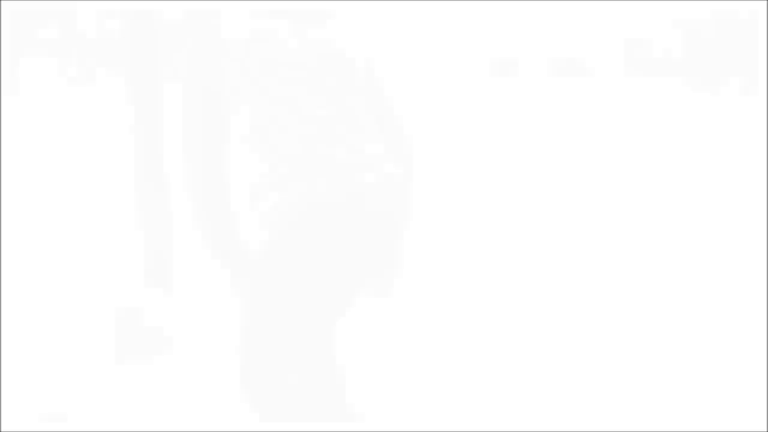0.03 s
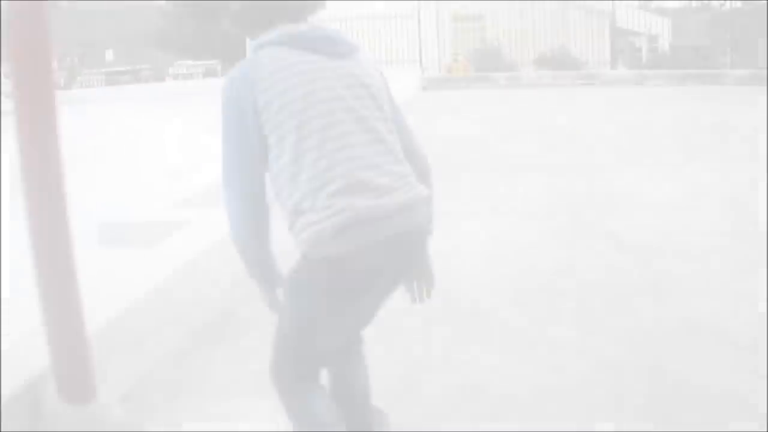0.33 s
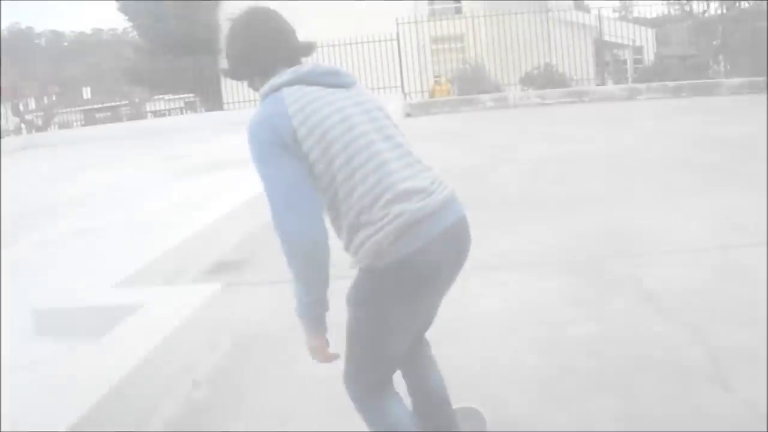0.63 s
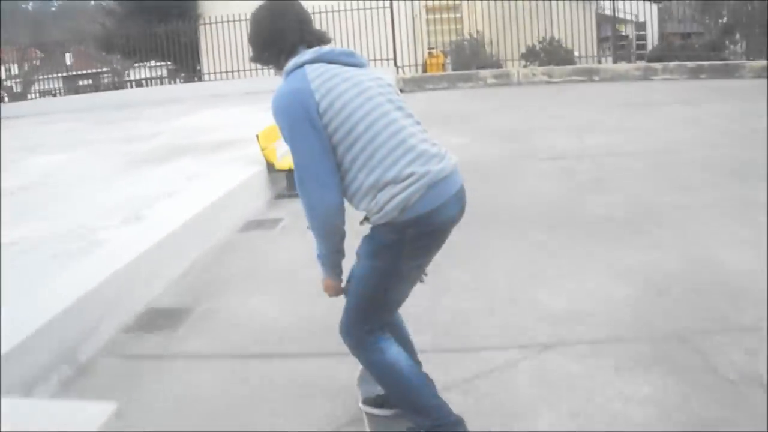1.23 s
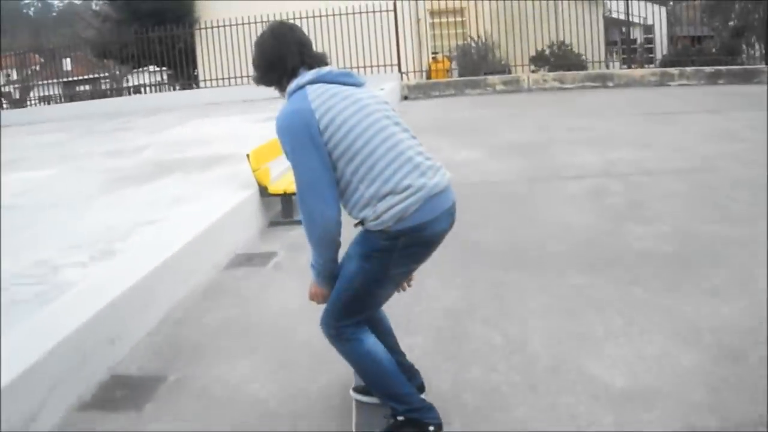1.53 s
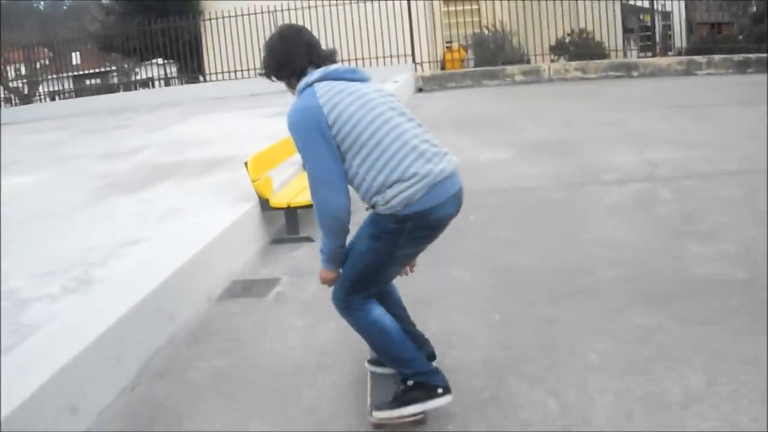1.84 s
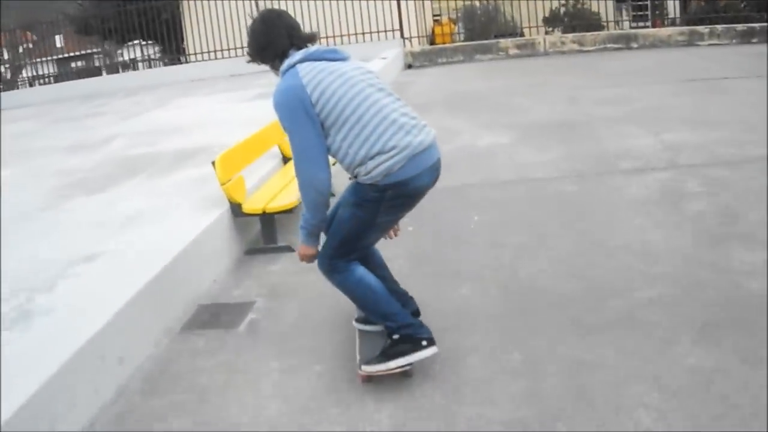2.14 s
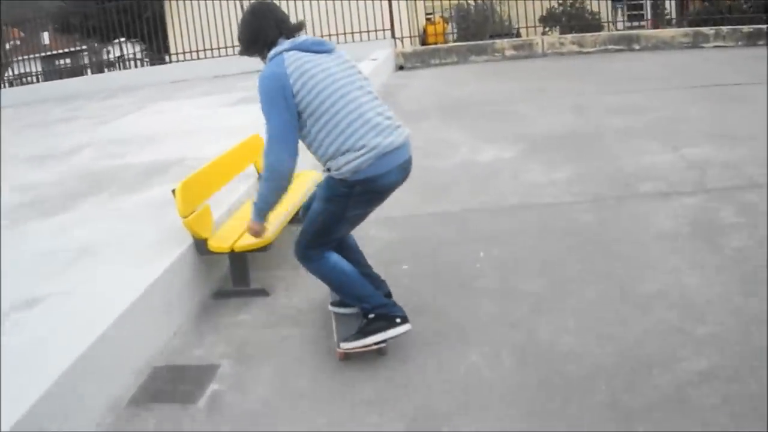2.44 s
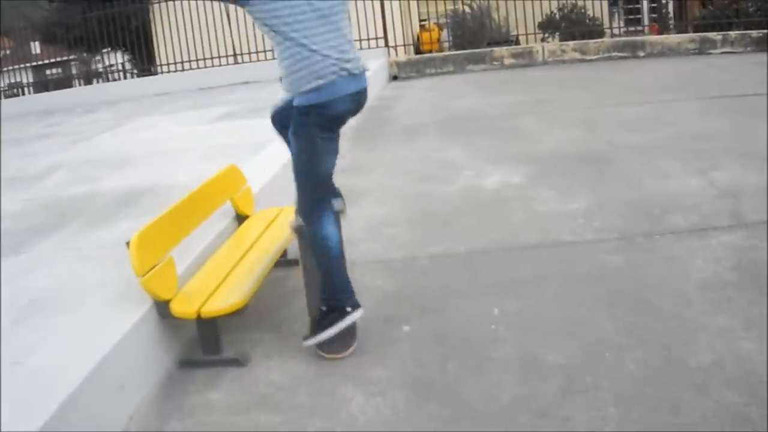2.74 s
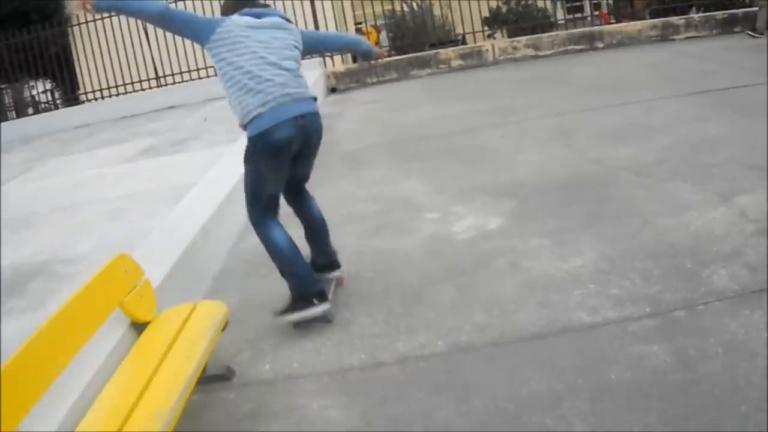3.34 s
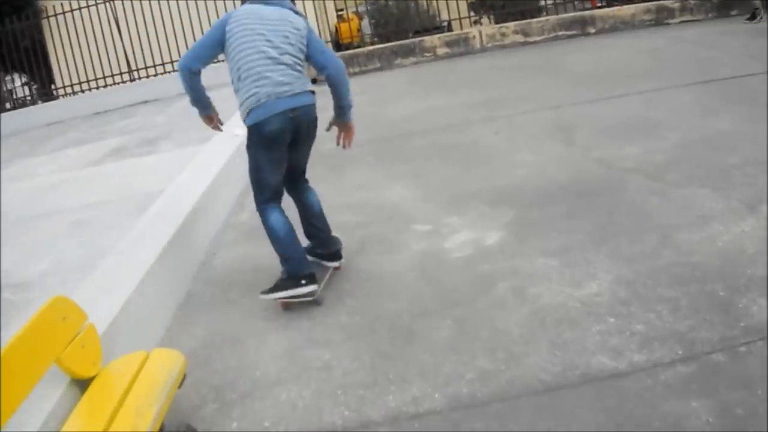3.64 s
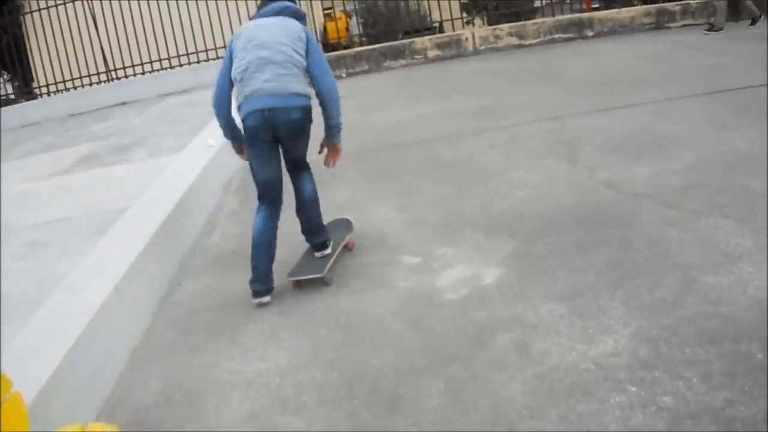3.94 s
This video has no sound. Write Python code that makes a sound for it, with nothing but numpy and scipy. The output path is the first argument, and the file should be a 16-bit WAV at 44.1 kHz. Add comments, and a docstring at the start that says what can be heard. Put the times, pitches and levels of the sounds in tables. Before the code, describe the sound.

A skateboard rolls over rough concrete, pops, scrapes along a bench and lands with a clack.

```python
"""Skateboard and bench

The microphone rides on a skateboard rolling over rough concrete in an open yard: the grain makes its wheels
roar, the bearings hiss and sing, and wind buffets the microphone. Alongside, another board's tail pops, it
knocks onto a slatted bench and scrapes along it, the wheels thud down, the deck slaps the ground and the roll
fades. The blows are bursts of tiny contacts and ringing modes of wood and steel."""
import sys
import numpy as np
from scipy import signal
from scipy.fft import rfft, irfft
from scipy.io import wavfile
from scipy.ndimage import uniform_filter1d

SR = 44100
rng = np.random.default_rng(int(sys.argv[2]) if len(sys.argv) > 2 else 0)


def inscribe(sig):
    """Save sig as 16-bit PCM at rate SR to the path in sys.argv[1].

    A 1-D sig is mono; a 2-D sig holds one channel per row.
    Samples are clipped to [-1, 1] before scaling.
    """
    pcm = np.round(np.clip(np.atleast_2d(sig).T, -1, 1) * 32767)
    wavfile.write(sys.argv[1], SR, pcm.astype(np.int16))


N = 176400
T = np.arange(N) / SR


def from_db(db):
    """Decibels to gain."""
    return 10 ** (np.asarray(db) / 20)


def unit_rms(x):
    """Scale to unit power."""
    return x / np.sqrt(np.mean(x ** 2) + 1e-20)


def fader(points):
    """A gain ride through (time [s], level [dB]) points."""
    return from_db(np.interp(T, *np.transpose(points)))


def swell(start, length):
    """A rounded rise and fall."""
    return np.sin(np.pi * np.clip((T - start) / length, 0, 1))


def drift(rate_hz):
    """A random wander of unit power; its rate may change with time."""
    position = np.cumsum(rate_hz * np.ones(N)) / SR
    return unit_rms(np.interp(position, np.arange(N), rng.standard_normal(N)))


def equalise(x, points):
    """Minimum-phase EQ: the points set only the shape, so white noise keeps its power."""
    hz, db = np.transpose(points)
    size = 2 * N
    bin_hz = np.arange(N + 1) * SR / size
    gain = unit_rms(from_db(np.interp(np.log(bin_hz + 1), np.log(hz), db)))
    cepstrum = irfft(np.log(gain))
    cepstrum[1:N] *= 2
    cepstrum[N + 1:] = 0
    return irfft(rfft(x, size) * np.exp(rfft(cepstrum)))[:N]


def grains(per_second=10000, spread_db=2.0):
    """Dense random contacts with the grain of the concrete."""
    sizes = from_db(spread_db * np.minimum(rng.exponential(1, N), 5))
    return sizes * rng.choice([-1, 1], N) * (rng.random(N) < per_second / SR)


def crunch(blows, eq, attack_s=0.00052, hold_s=0.0067):
    """Each blow is a short dying burst of tiny contacts, coloured by the body it hits."""
    out, size = np.zeros(N + SR), 8192
    age = T[:size]
    for start, db, decay in blows:
        fall = np.exp(-np.maximum(age - min(hold_s, decay), 0) / decay)
        envelope = np.minimum(age / attack_s, 1) * fall
        contacts = envelope * rng.choice([-1, 1], size)
        whitened = irfft(np.exp(1j * np.angle(rfft(contacts))))
        taper = envelope ** .2   # tightens the decay a little
        at = int(start * SR)
        out[at:at + size] += from_db(db) * np.linalg.norm(envelope) * whitened * taper
    return equalise(out[:N], eq)


def ring(blows, modes, spread_db=1.5):
    """Each blow (time [s], level [dB]) sets every mode ringing with a slightly random strength."""
    out, age = np.zeros(N + SR), T[:SR // 4]
    hz, mode_db, t60 = np.transpose(modes)[:, :, None]
    partials = np.sin(2 * np.pi * hz * age) * np.exp(-np.log(1000) * age / t60)
    polarity = (-1) ** np.arange(len(modes))
    for start, db in blows:
        gains = from_db(db + mode_db[:, 0] + spread_db * rng.standard_normal(len(modes)))
        at = int(start * SR)
        out[at:at + len(age)] += (gains * polarity) @ partials
    return out[:N]


def resonate(x, hz, width_hz):
    """One resonance with unity gain at its peak."""
    r = np.exp(-np.pi * width_hz / SR)
    feedback = [1, -2 * r * np.cos(2 * np.pi * hz / SR), r * r]
    return signal.lfilter(np.array([1, 0, -1]) * (1 - r * r) / 2, feedback, x)


# Level ride of the wheel roar (time [s], level [dB])
ROAR_FADER = [(.07, -21), (.25, -23), (.5, -19), (.8, -19), (1.05, -17), (1.17, -18), (1.42, -15.5),
              (1.95, -18.5), (2.2, -18.7), (2.45, -16.5), (2.62, -16), (2.8, -24), (3.3, -26.5),
              (3.43, -29.5), (3.6, -32), (3.73, -37.5)]
# Its low-mid body (frequency [Hz], gain [dB])
ROAR_EQ = [(30, -15.5), (90, -16), (170, -6), (380, -3), (620, -2), (950, -6.5), (1280, -8.5), (1600, -16),
           (2200, -30.5), (4000, -38.5), (11000, -70)]
# Wheel resonance (frequency [Hz], width [Hz], boost [dB])
WHEEL_PEAKS = [(644, 212, 8)]


def wheel_roar(flutter_db=.5, drone_db=-27):
    """Concrete grain drives wheels and deck into a fluttering roar, with a lower drone at first."""
    flutter = from_db(flutter_db * drift(70))
    body = equalise(grains(), ROAR_EQ)
    peaks = sum((from_db(db) - 1) * resonate(body, hz, width) for hz, width, db in WHEEL_PEAKS)
    roar = unit_rms(flutter * (body + peaks))
    drone = unit_rms(resonate(equalise(grains(), ROAR_EQ), hz=366, width_hz=62))
    return fader(ROAR_FADER) * roar + from_db(drone_db) * swell(start=0.03, length=0.8) * drone


# Level ride of the bearing and grit hiss (time [s], level [dB])
HISS_FADER = [(.17, -39), (.5, -36.5), (1.45, -37), (1.8, -38.5), (2.3, -39.5), (2.64, -35), (2.78, -36.5),
              (2.98, -43.5), (3.3, -44.5), (3.46, -45), (3.68, -53.5)]
# Its bright tone (frequency [Hz], gain [dB])
HISS_EQ = [(700, -27), (2000, 9), (2700, 4), (3300, 5.5), (4500, 4), (6200, 4), (7500, 0.5), (9300, 1),
           (11000, -9.5)]
# The note the bearings sing (time [s], pitch [Hz], level [dB])
SING_GLIDE = [(0.401, 5595, -55), (2.2, 5350, -44.5), (2.617, 5730, -39), (2.952, 6370, -55),
              (3.66, 6300, -64), (3.85, 6340, -51.5), (4.0, 6000, -67)]
# Roughness of that note (time [s], bandwidth [Hz])
SING_BANDWIDTH = [(2.6, 1495), (3.7, 750)]


def bearings(flutter_db=1.5):
    """Bearings and grit rattle into a fine hiss, while a thin, rough note glides."""
    hiss = unit_rms(equalise(grains(), HISS_EQ) * from_db(flutter_db * drift(90)))
    times, hz, db = np.transpose(SING_GLIDE)
    phase = 2 * np.pi * np.cumsum(np.interp(T, times, hz)) / SR
    width = np.interp(T, *np.transpose(SING_BANDWIDTH))
    sing = unit_rms(drift(width) * np.cos(phase) + drift(width) * np.sin(phase))
    return fader(HISS_FADER) * hiss + from_db(np.interp(T, times, db)) * sing


# Gusts on the microphone (time [s], length [s], level [dB])
WIND_GUSTS = [(0.079, 0.078, -17), (1.465, 0.35, -17.5), (2.393, 0.5, -32.5), (2.683, 0.044, -20),
              (3.474, 0.21, -32.5), (3.796, 0.49, -40)]
# Their bass-heavy rumble (frequency [Hz], gain [dB])
WIND_EQ = [(12, -20.5), (28, 6), (60, -8), (100, -5), (190, -8), (350, -27.5), (4000, -69.5)]
# Sharp puffs of air (time [s], level [dB], pitch [Hz])
AIR_PUFFS = [(0.1113, -13.5, 117), (1.4873, -8, 59.4), (3.51, -20, 44.2)]


def wind(breeze_db=-40, rasp_db=-26, rasp_hz=297, rasp_width_hz=160, puff_cycles=1.5):
    """Air hits the microphone: gusts rumble over a light breeze, the strongest rasp, and puffs thump."""
    level = from_db(breeze_db) + sum(from_db(db) * swell(at, length) for at, length, db in WIND_GUSTS)
    air = equalise(rng.standard_normal(N), WIND_EQ)
    rumble = air / np.sqrt(uniform_filter1d(air ** 2, size=2400) + 1e-9)   # levelled out
    band = resonate(rng.standard_normal(N), rasp_hz, rasp_width_hz)
    rasp = unit_rms(resonate(band, rasp_hz, rasp_width_hz))
    thumps = sum(-from_db(db) * swell(at, puff_cycles / hz) * np.sin(2 * np.pi * hz * (T - at))
                 for at, db, hz in AIR_PUFFS)
    return level * rumble + from_db(rasp_db) * (level / level.max()) ** 2 * rasp + thumps


# Ticks under the board: grit under the wheels, and clicks of the steel trucks near 0.78 and 0.94 s (time [s],
# level [dB], decay [s])
BOARD_TICKS = [(.234, -28.5, 0.005), (.783, -23.5, 0.014), (.820, -25, 0.0013), (.9425, -17, 0.0021),
               (.995, -30.5, 0.0064), (1.1365, -26, 0.0026), (1.463, -26, 0.004), (1.603, -24, 0.0023),
               (3.346, -32, 0.0018), (3.407, -30, 0.0043), (3.438, -38.5, .005), (3.934, -31.5, 0.0013)]
# Their thin, crisp tone (frequency [Hz], gain [dB])
TICK_EQ = [(300, -47), (1200, 4.5), (2200, -7.5), (3400, -0.5), (6000, -2.5), (8000, -12), (11000, -16)]


def board_ticks():
    """The wheels tick over grit and joints, and the trucks click near 0.78 and 0.94 s."""
    return crunch(BOARD_TICKS, TICK_EQ)


# Wheel bumps and landings (time [s], level [dB], decay [s], boom level [dB])
WHEEL_THUDS = [(.819, -20, 0.0056, -42), (.892, -26, 0.0097, -13.5), (1.464, -11, 0.0027, -31),
               (3.334, -16, 0.0035, -23), (3.3451, -15, 0.011, -20), (3.376, -19, 0.0063, -17)]
# Their dull tone (frequency [Hz], gain [dB])
THUD_EQ = [(80, -17), (300, 4.5), (800, 2.5), (1300, -1), (1650, -2.5), (2300, -21), (11000, -40)]
# Boom of the plank, also struck by the deck slaps (frequency [Hz], gain [dB], T60 [s])
PLANK_MODES = [(274, -11, 0.07), (506, -2.5, 0.053), (667, 4, 0.04), (1280, -9.5, 0.062),
               (1555, -15, 0.056)]


def wheel_thuds():
    """Soft wheels bump over joints and land, making the plank boom."""
    thuds = np.array(WHEEL_THUDS)
    return crunch(thuds[:, :3], THUD_EQ) + ring(thuds[:, [0, 3]], PLANK_MODES)


# Tail pop and landing slap (time [s], crack level [dB], decay [s], boom level [dB], ring level [dB])
DECK_SLAPS = [(2.7624, -8, 0.0042, -23, -16), (2.770, -16.5, 0.0048, -27, -38),
              (2.820, -24, 0.011, -44, -32), (3.389, -8.5, 0.0019, -6, -41),
              (3.391, -7.5, 0.0032, -30, -31)]
# Hard crack of wood on concrete (frequency [Hz], gain [dB])
CRACK_EQ = [(150, -9), (500, -3), (1000, 2.5), (1600, -2.5), (2300, -5), (3600, -2.5), (4800, -6),
            (6200, -6.5), (8000, -14.5), (11000, -24.5)]
# High ring of wood and trucks (frequency [Hz], gain [dB], T60 [s])
DECK_MODES = [(2035, -8, .04), (2482, -1, .07), (2708, -5, .08), (3370, 0, .055), (3535, -2, .05),
              (4075, -3, .06), (4447, -7, .04), (6072, -7, .07)]


def deck_slaps():
    """The deck strikes concrete: a crack, the boom of the plank and a bright ring."""
    hits = np.array(DECK_SLAPS)
    crack = crunch(hits[:, :3], CRACK_EQ)
    boom = ring(hits[:, [0, 3]], PLANK_MODES)
    return crack + boom + ring(hits[:, [0, 4]], DECK_MODES)


# Clacks of the trucks (time [s], level [dB])
TRUCK_CLACKS = [(2.7637, -8), (3.392, -7.5)]
# Their tight steel ring (frequency [Hz], gain [dB], T60 [s])
STEEL_MODES = [(3880, 4.5, 0.009), (5000, -10, .018), (6250, -7, 0.015)]


def truck_clacks():
    """The steel trucks clack on the pop and on the landing."""
    return ring(TRUCK_CLACKS, STEEL_MODES)


# Knocks on the bench (time [s], level [dB], decay [s])
BENCH_KNOCKS = [(3.0142, -11.5, 0.012), (3.032, -27, .005), (3.040, -26, 0.0033)]
# Their midrange punch (frequency [Hz], gain [dB])
KNOCK_EQ = [(100, -28), (350, -12), (550, 4.5), (1250, -2), (1900, -1), (2300, -6.5), (3600, -4.5),
            (5500, -8.5), (11000, -22.5)]
# Ring of the slats (frequency [Hz], gain [dB], T60 [s])
SLAT_MODES = [(410, -8, .2), (495, -5, .14), (1055, -2, .11), (1280, 2, .08), (1930, -3, .05),
              (2035, -4, .06), (2985, -9, .07), (4645, -12, .12), (6740, -14, .05)]


def bench_knock(ring_db=-1):
    """The board knocks onto the bench and sets the slats ringing."""
    hits = np.array(BENCH_KNOCKS)
    return crunch(hits, KNOCK_EQ) + from_db(ring_db) * ring(hits[:, :2], SLAT_MODES)


# Scrapes along the slats (time [s], level [dB], decay [s], ring level [dB])
SLAT_SCRAPES = [(3.03, -18, 0.02, -40), (3.065, -19, 0.012, -45), (3.086, -18, 0.019, -21.5),
                (3.225, -30, 0.021, -49), (3.272, -33, 0.0091, -39)]
# Their darker tone (frequency [Hz], gain [dB])
SCRAPE_EQ = [(100, -4), (380, 3.5), (1100, -1), (1700, -12.5), (3300, -10), (4500, -11.5), (6500, -11),
             (11000, -23.5)]
# Their metallic overtones (frequency [Hz], gain [dB], T60 [s])
SCRAPE_RING = [(410, 2, .12), (2579, -4, .075), (3338, 1.5, .08), (5319, -4, .08)]


def bench_scrape():
    """The board scrapes along the slats in short bursts with a thinner, metallic ring."""
    scrapes = np.array(SLAT_SCRAPES)
    return crunch(scrapes[:, :3], SCRAPE_EQ) + ring(scrapes[:, [0, 3]], SCRAPE_RING)


def yard_reverb(x, t60_s=1, send_db=-20, lowpass_hz=3500, build_s=0.0067):
    """A faint, dull tail scattered by the walls."""
    age = T[:SR]
    tail = rng.standard_normal(SR) * np.minimum(age / build_s, 1) * np.exp(-np.log(1000) * age / t60_s)
    lowpass = signal.butter(1, lowpass_hz, fs=SR, output="sos")
    tail = signal.sosfilt(lowpass, tail / np.linalg.norm(tail))
    return signal.fftconvolve(from_db(send_db) * x, tail)[:N]


def scene():
    """Mono mix of roll, impacts and wind; only the impacts feed the reverb."""
    impacts = deck_slaps() + bench_knock() + bench_scrape()
    impacts += wheel_thuds() + board_ticks() + truck_clacks()
    return (wheel_roar() + bearings() + impacts + yard_reverb(impacts) + wind())[None]


def record(dry):
    """Soft-clip the loudest peaks, cut in abruptly mid-roll and filter off the top."""
    ceiling, start_s, stopband_hz = .82, .069, 11260
    clipped = dry / (1 + (dry / ceiling) ** 6) ** (1 / 6)
    lowpass = signal.cheby2(18, 60, stopband_hz, fs=SR, output="sos")
    return signal.sosfilt(lowpass, clipped * (T > start_s))


dry = scene()
out = record(dry)
inscribe(out)
```